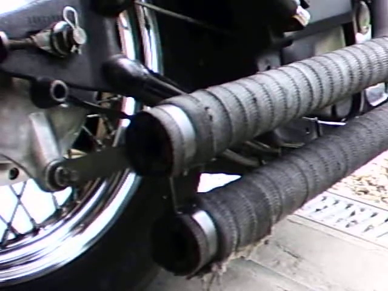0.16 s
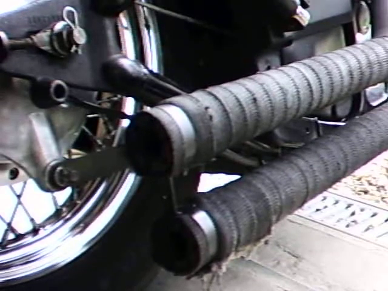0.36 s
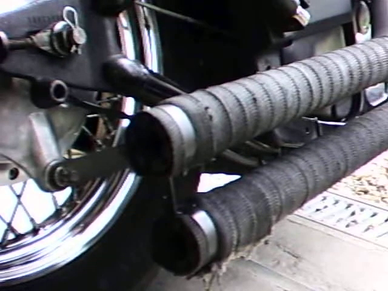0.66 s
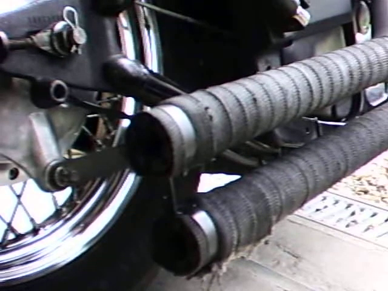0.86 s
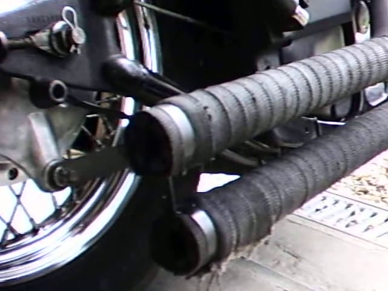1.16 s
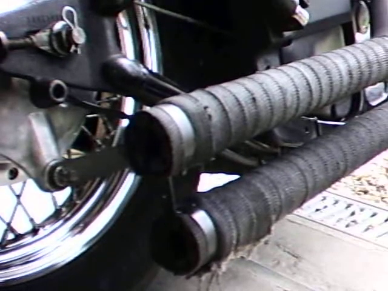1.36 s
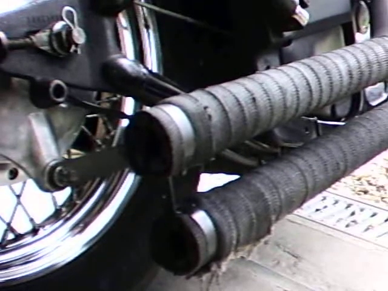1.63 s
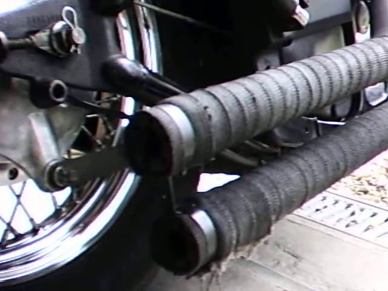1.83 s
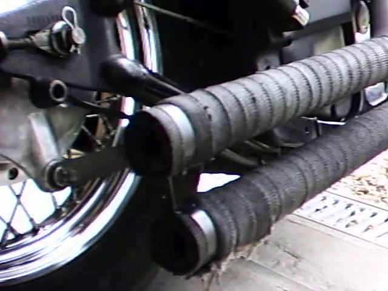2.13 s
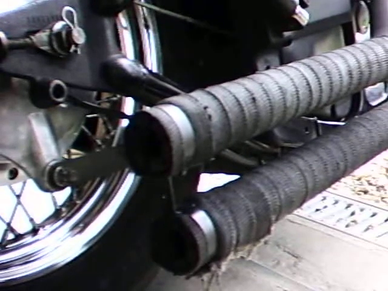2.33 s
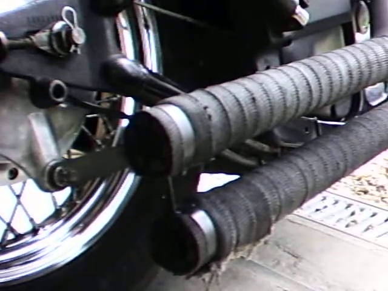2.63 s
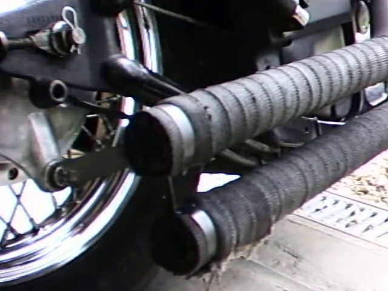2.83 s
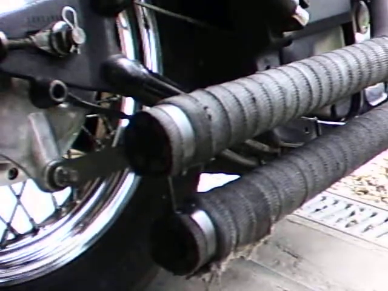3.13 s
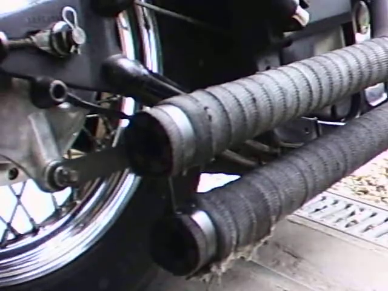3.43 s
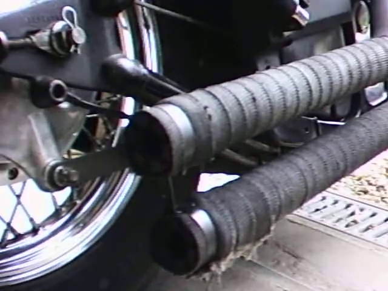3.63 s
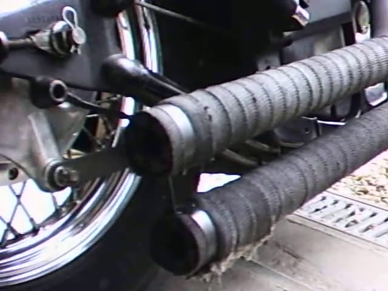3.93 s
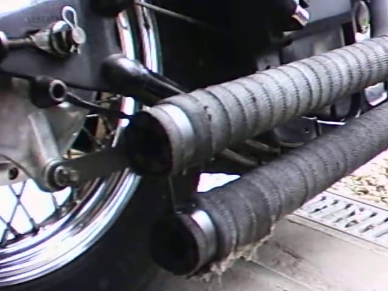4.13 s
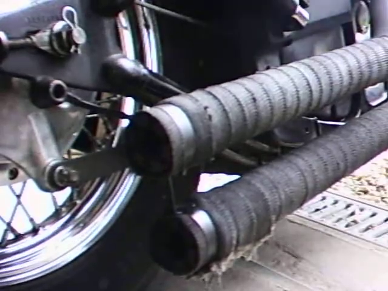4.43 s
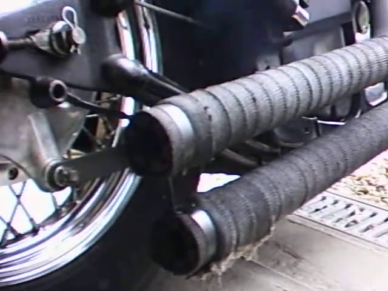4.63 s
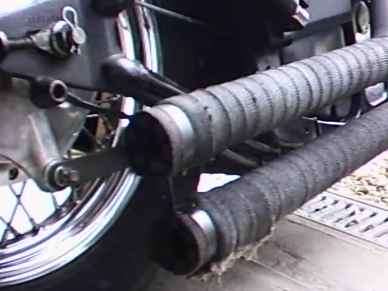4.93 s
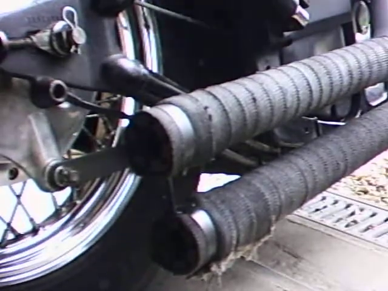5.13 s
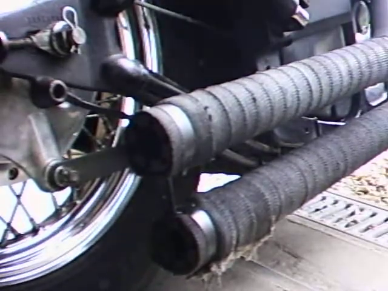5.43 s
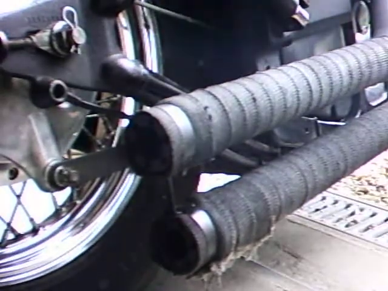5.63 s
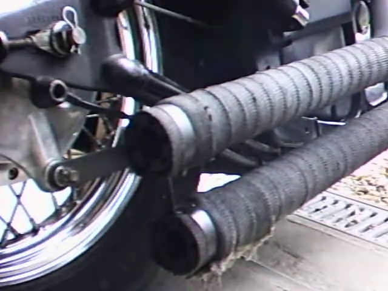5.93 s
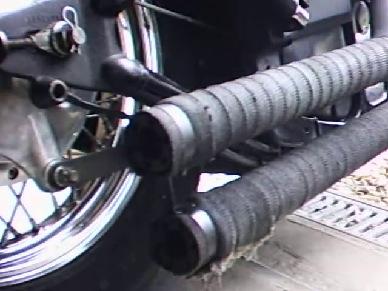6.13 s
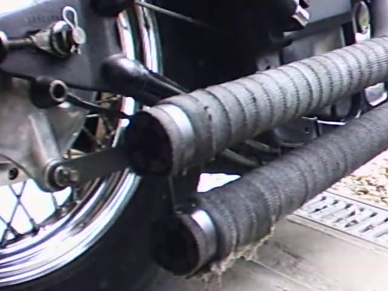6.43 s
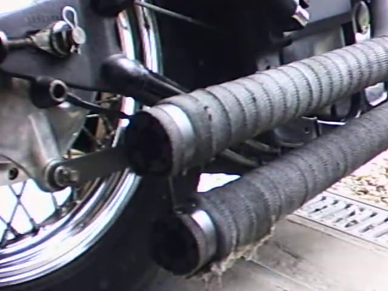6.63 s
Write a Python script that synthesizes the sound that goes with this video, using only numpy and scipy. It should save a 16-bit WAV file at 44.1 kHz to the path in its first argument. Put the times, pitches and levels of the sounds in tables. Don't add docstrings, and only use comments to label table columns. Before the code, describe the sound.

Close, gritty V-twin exhaust outdoors: roaring burst, uneven thumping idle, a second rev, fast irregular popping with hiss, and a final rising rev.

```python
import sys
import numpy as np
from scipy import signal
from scipy.fft import rfft, irfft
from scipy.io import wavfile
from scipy.ndimage import uniform_filter1d, minimum_filter1d

SR = 44100
rng = np.random.default_rng(int(sys.argv[2]) if len(sys.argv) > 2 else 0)


def voltage_ratio(decibels):
    exponent = np.asarray(decibels, float) / 20
    return 10 ** exponent


def bounce(signal):
    frames = np.transpose(np.atleast_2d(signal))
    limited = np.clip(frames, -1, 1)
    pcm = np.round(limited * 32767).astype(np.int16)
    wavfile.write(sys.argv[1], SR, pcm)


N = 298998

# (time [s], engine speed [cycles/s])
REV_RUNS = [
    [(.01, 22.4), (.15, 28.5), (.3, 18.4)],
    [(.695, 22), (.75, 25.98), (.9, 35), (1.04, 35.8)],
    [(1.049, 37.5), (1.23, 31.2), (1.41, 29.5), (1.7, 18.8), (1.96, 17.1)],
    [(4.01, 15), (4.2, 17.5), (4.4, 21), (4.6, 34), (4.9, 25), (5.11, 25.8)],
    [(6.665, 24.7), (6.77, 33.5)],
]
# (time [s], peak [dB re overload])
SLAP_PEAKS = [(0.0714, 1), (0.8344, .3), (0.8624, .5), (0.8944, .9), (0.9936, .6), (1.0234, .4),
              (1.0485, 1.3), (1.0755, -1.5), (1.1014, -1.5), (1.1288, .9), (1.1558, .9), (1.1842, .6),
              (1.2126, .7), (1.2434, .6), (1.2725, 1.3), (1.3044, -1.2), (1.3369, .2), (1.3698, .4),
              (1.4042, .2), (4.6094, .2)]
# (frequency [Hz], level [dB per Hz])
AFTERFLOW_SPECTRUM = [(530, -39.5), (900, -17), (1110, -14.5), (1250, -10), (1420, -17.5), (1760, -9),
                      (2190, -3.5), (2390, -12.5), (2680, -2), (3850, -6), (4240, 3), (4600, -51.5),
                      (5980, -70), (10100, -120)]
# (frequency [Hz], level [dB per Hz])
RASP_SPECTRUM = [(380, -8), (480, -1.5), (700, -2), (1000, -6), (1500, -15.5)]
# (frequency [Hz], level [dB per Hz])
RUMBLE_SPECTRUM = [(47, -26.5), (80, -15), (113, -2), (177, -4.5), (306, -4), (385, -10), (500, -23),
                   (850, -120)]
# (frequency [Hz], width [Hz], level [dB])
NARROW_PEAKS = [(1200, 7.8, 9), (1600, 12, 1), (1740, 16, 6.5), (1954, 33, 3), (2110, 51, 6.5),
                (2573, 43, 8), (2875, 14, -5)]

FLOW_REF_DB = -25
OVERLOAD = .70


def rms_one(x):
    return x / np.sqrt(np.mean(x ** 2) + 1e-20)


def coloured(spectrum, peaks=()):
    hz, db = np.transpose(spectrum)
    grid = np.maximum(np.fft.rfftfreq(N, 1 / SR), 1)
    shape_db = np.interp(np.log(grid), np.log(hz), db)
    for centre, width, top_db in peaks:
        shape_db += top_db / (1 + (2 * (grid - centre) / width) ** 2)
    return rms_one(irfft(rfft(rng.standard_normal(N)) * voltage_ratio(shape_db), N))


def flutter(hz, db):
    r = np.exp(-2 * np.pi * hz / SR)
    wander = signal.lfilter([1], [1, -2 * r, r * r], rng.standard_normal(N + SR))
    return voltage_ratio(db * rms_one(wander[SR:]))


def clicks(times, gains):
    out = np.full(N, 1e-18)
    np.add.at(out, np.clip((times * SR).astype(int), 0, N - 1), gains)
    return out


def burst(hits, rise, fall):
    a = np.exp(-1 / (max(rise, 1e-4) * SR))
    b = np.exp(-1 / (fall * SR))
    decay = signal.lfilter([1], [1, -b], hits)
    return signal.lfilter([1 - a], [1, -a], decay)


def struck(times, db, modes, spread_db, steady):
    out = 0
    luck = rng.standard_normal((len(times), len(modes), 2))
    for k, (hz, mode_db, t60) in enumerate(modes):
        r, w = voltage_ratio(-60 / (t60 * SR)), 2 * np.pi * hz / SR
        strength = voltage_ratio(db + mode_db + spread_db * luck[:, k, 0])
        hits = clicks(times, strength * np.sign(luck[:, k, 1] + steady))
        out = out + signal.lfilter([0, np.sin(w)], [1, -2 * r * np.cos(w), r * r], hits)
    return out


def crank(run):
    s, speed = np.transpose(run)
    t = np.arange(s[0], s[-1], 1 / SR)
    return t, np.cumsum(np.interp(t, s, speed)) / SR


def flow_over_ref(times, hiss_db):
    return hiss_db[(times * SR).astype(int)] - FLOW_REF_DB


def revved_firings(hiss_db, rumble_db, throttle):
    # (lag behind the front firing [cycles], level over the hiss [dB], extra at full throttle [dB])
    cylinders = ((0, 9, 5), (.41, 9.5, -1.5))
    rows = []
    for run in REV_RUNS:
        t, cycles = crank(run)
        for lag, over_db, load_db in cylinders:
            at = np.interp(np.arange(lag, cycles[-1]), cycles, t)
            i = (at * SR).astype(int)
            level = over_db + load_db * throttle[i] + hiss_db[i]
            thump = rumble_db[i] + 11 - level
            crack = np.full(len(at), -10.5)
            rows.append(np.c_[at, level, crack, thump])
    rows = np.vstack(rows)
    return rows + rng.standard_normal(rows.shape) * [.0004, 1.8, 3.0, 1.2]


def slow_firings(hiss_db):
    # (front firing [s], rear delay [ms], front peak [dB], rear peak [dB])
    coasting = [(.3312, 45, -8.5, -14.5), (.4098, 32, -24, -17), (.4662, 46.6, -10, -13.5),
                (.5626, 23, -14, -43), (.633, 29, -11.5, -11.5)]
    idling = [(1.98, 34.1, -13, -17), (2.0423, 34.95, -11.5, -26.5), (2.1143, 44.5, -18, -11),
              (2.1922, 53.9, -16, -11.5), (2.3317, 32.35, -12, -8.5), (2.433, 31.24, -17.5, -8),
              (2.5253, 43.4, -8.5, -14), (2.6342, 44.9, -17.5, -9), (2.7429, 52.2, -6.5, -22.5),
              (2.8535, 44.97, -6, -8), (2.959, 43, -10, -23.5), (3.0703, 44.9, -8, -8),
              (3.179, 40.6, -20, -10), (3.2897, 45.5, -5.5, -11), (3.4043, 46.16, -12, -6.5),
              (3.5206, 46, -7.5, -8.5), (3.6423, 49.1, -7.5, -11), (3.7676, 37.2, -21.5, -10),
              (3.8724, 51.5, -4.5, -4.5), (3.9714, 37.62, 2, 0)]
    fast_idling = [(5.1309, 33, -10, -6), (5.2112, 44, -13.5, -13), (5.3334, 61, -13.5, -18.5),
                   (5.4236, 23, -17.5, -29), (5.4869, 24.3, -13, -12), (5.5479, 27.7, -8.5, -6.5),
                   (5.6138, 20, -12.5, -11.5), (5.6725, 28, -4, -5.5), (5.752, 22, -8.5, -39),
                   (5.801, 33.5, -10.5, -4), (5.867, 17, -12, -24), (5.9383, 24, -1.5, -8),
                   (6.006, 21, -5, -11.5), (6.0681, 21, -11, -0.5), (6.1559, 27, -18.5, -31),
                   (6.2022, 23.6, -19.5, -4), (6.2704, 29.2, -1.5, -6.5), (6.341, 29.6, -8, -21),
                   (6.412, 34.6, -11, -11), (6.4872, 35, -9, -34), (6.5634, 28, -5, -4.5),
                   (6.6339, 15, -6, -25)]
    s, delay_ms, front_db, rear_db = np.vstack([coasting, idling, fast_idling]).T
    times = np.r_[s, s + delay_ms / 1000]
    peak_db = np.r_[front_db, rear_db]
    luck = rng.random((len(times), 2))
    crack_db = -11 + 8 * np.log(luck[:, 0])
    full_charge_db = -9.5
    thump_db = -20 + 1.1 * np.minimum(peak_db - full_charge_db, 0)
    thump_db += 3 * (2 * luck[:, 1] - 1)
    thump_db += 0.24 * flow_over_ref(times, hiss_db)
    return np.c_[times, peak_db, crack_db, thump_db - peak_db]


def cracks(times, peak_db, crack_db):
    # (frequency [Hz], level [dB], decay t60 [s])
    mouth_modes = [(1279, -4, 0.045), (1777, 4, 0.018), (2020, -12.5, 0.039), (2170, -5, 0.019),
                   (2650, 8.5, 0.0037), (2828, 0.5, 0.049), (3500, -13, 0.005)]
    hits = clicks(times, voltage_ratio(peak_db + crack_db))
    rasp = voltage_ratio(3.0) * burst(hits, rise=0.0014, fall=0.0046) * coloured(RASP_SPECTRUM)
    return rasp + struck(times + .002, peak_db - 17, mouth_modes, spread_db=4.0, steady=.8)


def gas(hiss_db, light):
    # (frequency [Hz], level [dB per Hz])
    roar_spectrum = [(530, -31.5), (900, -10), (1220, -5), (1440, -8.5), (1730, -6.5), (2020, -4),
                     (2390, -7.5), (2670, -2), (3700, -8.5), (4040, -5), (4400, -12), (5720, -60.5),
                     (9680, -120)]
    roar_from_db, roar_full_db = -27, -14.5
    heavy = np.clip((hiss_db - roar_from_db) / (roar_full_db - roar_from_db), 0, 1)
    noise = np.sqrt(1 - heavy) * coloured(light, NARROW_PEAKS)
    noise += np.sqrt(heavy) * coloured(roar_spectrum, NARROW_PEAKS)
    top = signal.sosfiltfilt(signal.butter(3, 3300, "high", fs=SR, output="sos"), noise)
    return noise + top * (voltage_ratio(-2.5) * flutter(hz=150, db=4.5) - 1)


def jets(times, peak_db, hiss_db):
    # (frequency [Hz], level [dB per Hz])
    hiss_spectrum = [(530, -29), (900, -20.5), (1060, -23.5), (1280, -5.5), (1480, -16), (2180, -8),
                     (2390, -9.5), (2820, 2), (3420, -21), (3850, 1), (4400, 3), (5720, -58.5),
                     (9680, -120)]
    hits = clicks(times, voltage_ratio(peak_db))
    puff = voltage_ratio(-11) * burst(hits, rise=0.00058, fall=0.016) * gas(hiss_db, hiss_spectrum)
    tail = voltage_ratio(-12) * burst(hits, rise=0.0012, fall=0.025) * gas(hiss_db, AFTERFLOW_SPECTRUM)
    tail *= flutter(hz=45.6, db=2.0)
    return (puff + tail) * flutter(hz=168, db=2.5)


def thumps(times, db):
    # (frequency [Hz], level [dB], decay t60 [s])
    pipe_modes = [(112, -.5, .075), (200, -4, .05), (250, -4, .06), (335, -2, .12)]
    ring = struck(times + .0015, db - 8, pipe_modes, spread_db=2.2, steady=3.0)
    ring += whoops(times, db - 12.5, from_hz=240, to_hz=365)
    rumble = burst(clicks(times, voltage_ratio(db)), rise=.003, fall=.012) * coloured(RUMBLE_SPECTRUM)
    low_cut = signal.butter(2, 75, "high", fs=SR, output="sos")
    return signal.sosfilt(low_cut, ring + voltage_ratio(-11) * rumble)


def whoops(times, db, from_hz, to_hz):
    t = np.arange(SR // 8) / SR
    hz = to_hz - (to_hz - from_hz) * np.exp(-t / .022)
    swell_and_die = (1 - np.exp(-t / .008)) * np.exp(-t / .03)
    tone = np.sin(2 * np.pi * np.cumsum(hz) / SR) * swell_and_die
    return signal.fftconvolve(clicks(times, voltage_ratio(db)), tone)[:N]


def glides(slow):
    front, rear = np.split(slow, 2)
    out = 0
    for rows, from_hz, to_hz in ((front, 265, 380), (rear, 205, 315)):
        thump_db = rows[:, 1] + rows[:, 3]
        out = out + whoops(rows[:, 0], thump_db - 7.5, from_hz, to_hz)
    return out


def pushes(slow, hiss_db):
    # (frequency [Hz], level [dB re thump], decay t60 [s])
    push_mode = [(125, -3.5, 0.026)]
    times, peak_db, _, thump_db = slow.T
    db = peak_db + thump_db - 1.1 * (flow_over_ref(times, hiss_db) + 9)
    return struck(times + 0.0017, db, push_mode, spread_db=1.5, steady=3.0)


def slaps():
    # (frequency [Hz], level [dB], decay t60 [s])
    slap_modes = [(1750, -3, .018), (2000, 0, .02), (2220, -2, .018), (2650, -2, .02)]
    times = np.transpose(SLAP_PEAKS)[0]
    out = 0
    for lag_s, db in ((0, -16.5), (.0015, -15), (.0032, -16.5)):
        out = out + struck(times + lag_s, db, slap_modes, spread_db=1.0, steady=.5)
    return out


def order_tones():
    out = np.zeros(N)
    for run in REV_RUNS:
        t, cycles = crank(run)
        s, speed = np.transpose(run)
        gaining = np.interp(t, s[1:], np.maximum(np.diff(speed) / np.diff(s), 0))
        second_db = -53.5 + 0.35 * np.minimum(gaining, 55)
        tones = voltage_ratio(second_db) * np.sin(4 * np.pi * cycles)
        tones += voltage_ratio(-54) * np.sin(6 * np.pi * cycles)
        tones += voltage_ratio(-50.5) * np.sin(10 * np.pi * cycles)
        start = int(t[0] * SR)
        fade = signal.windows.tukey(len(t), 1800 / len(t))
        out[start:start + len(t)] += np.sqrt(2) * tones * fade
    return out * flutter(hz=4.3, db=-0.5)


def wake(slow):
    outflow = burst(clicks(slow[:, 0], voltage_ratio(slow[:, 1])), rise=0.023, fall=0.054)
    return voltage_ratio(-27) * outflow * coloured(AFTERFLOW_SPECTRUM, NARROW_PEAKS)


def flow(hiss_db, rasp_db, rumble_db):
    gusts = flutter(hz=24.8, db=2.0)
    hiss = voltage_ratio(hiss_db - 1.5) * flutter(hz=139, db=-2.0) * gas(hiss_db, AFTERFLOW_SPECTRUM)
    rasp = voltage_ratio(rasp_db + 3.5) * flutter(hz=97, db=5.0) * coloured(RASP_SPECTRUM)
    return gusts * (hiss + rasp) + voltage_ratio(rumble_db - 1.5) * coloured(RUMBLE_SPECTRUM)


def drone(over_db):
    # (frequency [Hz], level [dB per Hz])
    drone_spectrum = [(14, -26), (28, -11.5), (50, -10.5), (64, 1), (85, -5.5), (110, -31.5)]
    return voltage_ratio(-43.5 + 0.5 * over_db) * coloured(drone_spectrum)


def squeezed(sound):
    window = SR // 500
    peaks = -minimum_filter1d(-abs(sound), size=window)
    height = uniform_filter1d(peaks, size=window) / .63 + 1e-9
    return sound * np.tanh(height ** 1.5) ** (2 / 3) / height


def scene():
    # (time [s], flow as hiss [dB], throttle [0-1])
    gas_flow = [(0.0, -10, 0.27), (.13, -20.5, 0.33), (.58, -31, 0.15), (.7, -19.5, 0.55), (.88, -15, 1),
                (1.36, -17.5, 0.47), (1.43, -22.5, .4), (2.05, -28, 0.03), (2.45, -37, 0),
                (3.87, -37.5, .5), (4.1, -19, .5), (4.65, -19, 0.82), (4.95, -24.5, 0.9), (5.4, -26, 0.59),
                (6.02, -25, 1), (6.57, -31.5, 0.38), (6.63, -22.5, 0.8), (6.78, -14.5, 0.96)]
    s, hiss_points, throttle_points = np.transpose(gas_flow)
    t = np.arange(N) / SR
    hiss_db = np.interp(t, s, hiss_points)
    throttle = np.interp(t, s, throttle_points)
    over_db = hiss_db - FLOW_REF_DB
    rasp_db = -47.5 + 1.625 * over_db + 9.5 * throttle
    rumble_db = -31 + np.where(over_db < 0, 0.94, 0.44) * over_db

    slow = slow_firings(hiss_db)
    revved = revved_firings(hiss_db, rumble_db, throttle)
    times, peak_db, crack_db, thump_db = np.vstack([slow, revved]).T
    sound = cracks(times, peak_db, crack_db)
    sound += jets(times, peak_db, hiss_db)
    sound += thumps(times, peak_db + thump_db)
    sound += glides(slow) + pushes(slow, hiss_db)
    sound += order_tones() + wake(slow)
    sound += flow(hiss_db, rasp_db, rumble_db) + drone(over_db)
    return (squeezed(sound) + slaps())[None]


def swell(x):
    times, peak_db = np.transpose(SLAP_PEAKS)
    span = (times[:, None] * SR).astype(int) + np.arange(-SR // 250, SR // 100)
    edge = SR // 400
    height = abs(x[span[:, edge:-edge]]).max(axis=1)
    swell_db = peak_db - 20 * np.log10(height / OVERLOAD)
    gain_db = np.zeros(N)
    gain_db[span] = swell_db[:, None] * signal.windows.tukey(span.shape[1], .36)
    return x * voltage_ratio(gain_db)


def top_cut(x):
    return signal.sosfilt(signal.butter(12, 15800, fs=SR, output="sos"), x)


def record(dry):
    x = signal.sosfilt(signal.butter(2, 22, "high", fs=SR, output="sos"), dry)
    x = signal.sosfilt(signal.cheby2(12, 85, 5150, fs=SR, output="sos"), x)
    mix = np.clip(swell(x[0])[None], -OVERLOAD, OVERLOAD)
    return top_cut(mix)


dry = scene()
out = record(dry)
bounce(out)
```